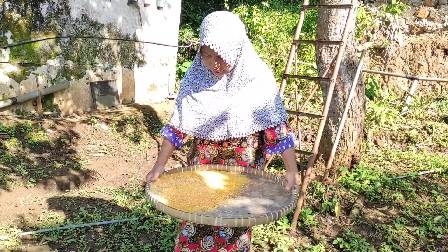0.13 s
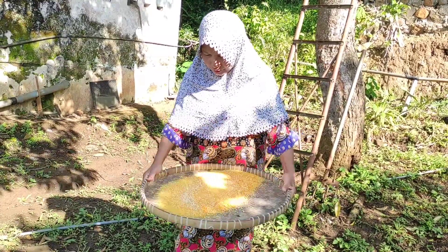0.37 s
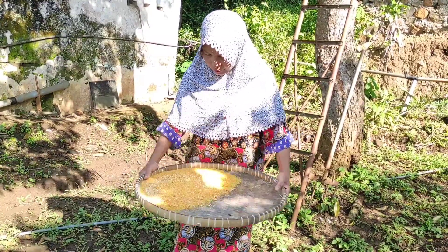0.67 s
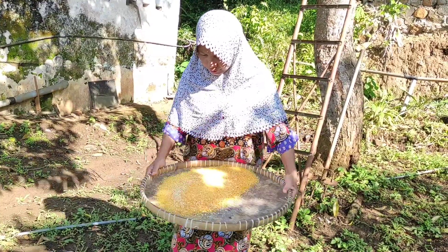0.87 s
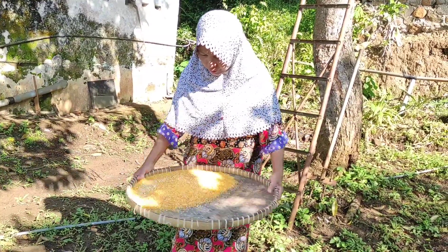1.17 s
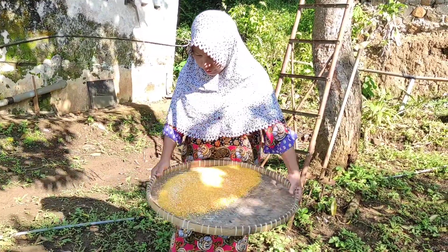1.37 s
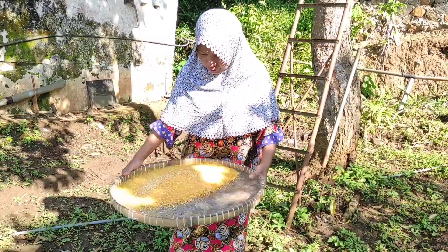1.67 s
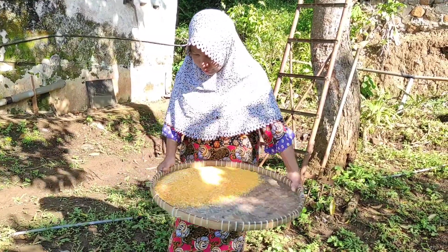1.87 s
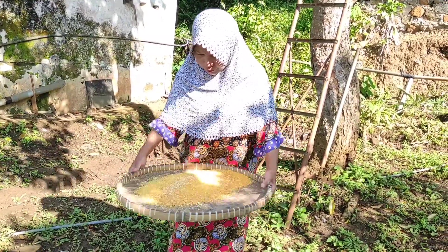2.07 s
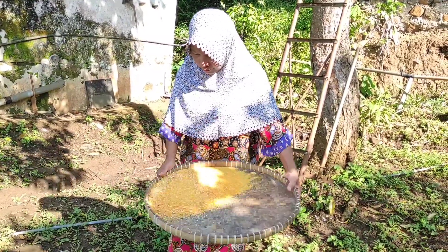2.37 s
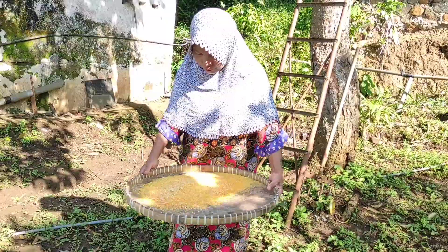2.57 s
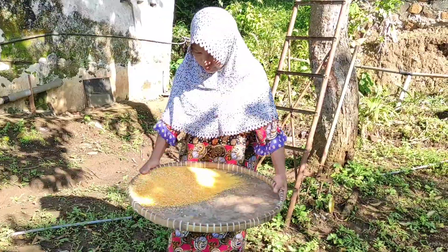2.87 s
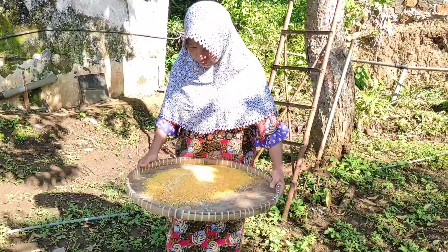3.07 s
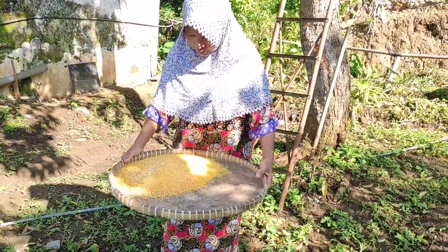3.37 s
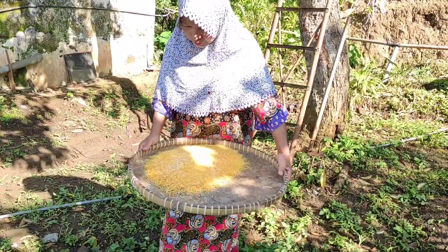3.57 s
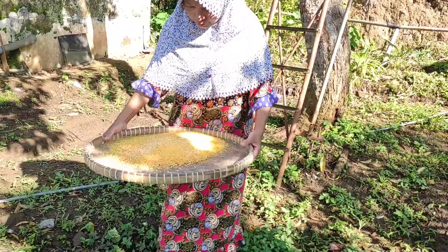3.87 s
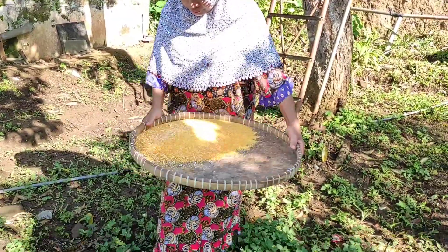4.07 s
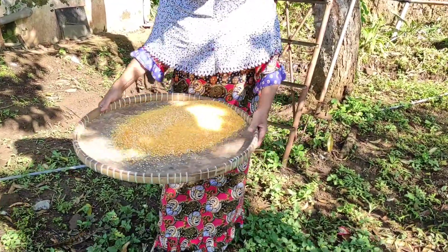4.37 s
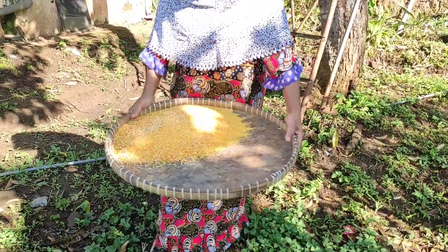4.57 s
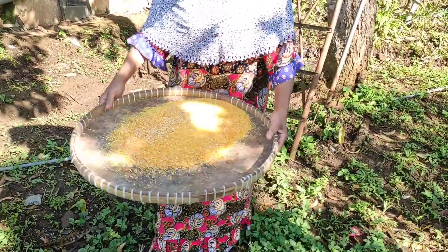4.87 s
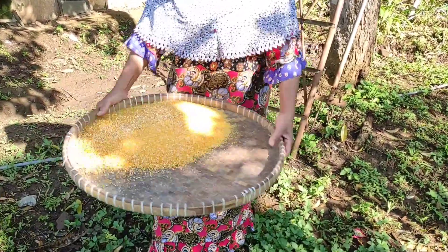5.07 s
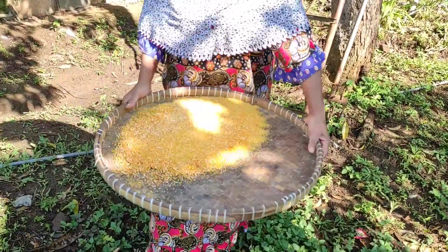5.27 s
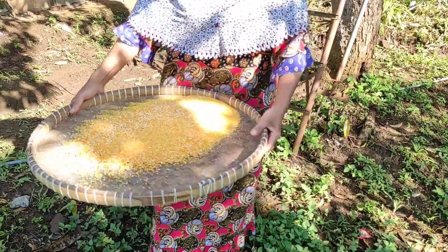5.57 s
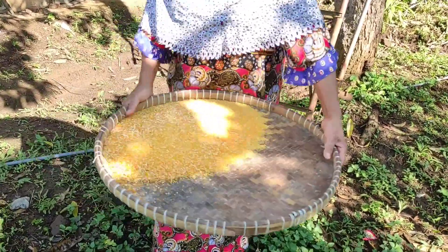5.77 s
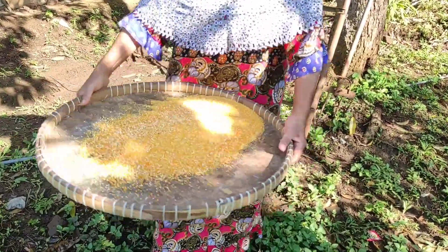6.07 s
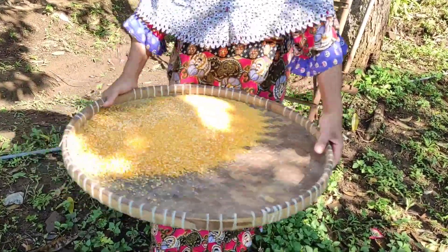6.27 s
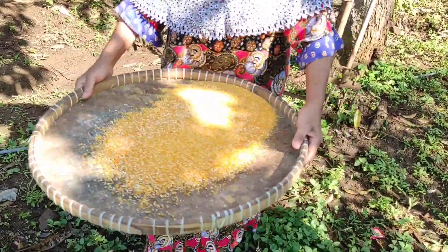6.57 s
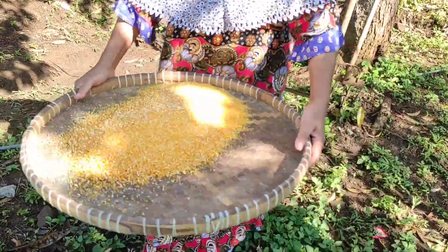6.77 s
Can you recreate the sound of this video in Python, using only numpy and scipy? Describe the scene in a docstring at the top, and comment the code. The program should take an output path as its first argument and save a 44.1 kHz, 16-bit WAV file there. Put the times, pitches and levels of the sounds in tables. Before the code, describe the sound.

Outdoors, close to a small stereo microphone, coarse cracked grain is shaken on a broad woven bamboo tray for about seven seconds. Strokes arrive nearly four a second, alternating a gradual swing back with an abrupt, crisper jerk out. Each is a short burst of bright, sizzling hiss made of countless kernel ticks, with a midrange rasp over the strips and quieter hollow drumming from the tray, dropping quickly into a small lull. A lone kernel ticks at 0.6 s. A low wind thump hits the right at 1.6 s; stronger fluttering puffs come around 3.1 s left, then 3.3-3.9 s right. A faint bamboo snap falls at 4.6 s and a sharp one at 5.1 s. From about 5 s the strokes are slightly louder and fuller. Another kernel ticks at 6.2 s. A very faint, dull murmur of leaves and distance stays beneath.

```python
"""Bursts of bright hiss and low drumming, about four a second: cracked grain slides to and fro over a
woven bamboo tray held near a small two-port microphone, outdoors. Random kernel impacts are filtered into
hiss, rasp and drumming that follow each stroke; decaying sines make the snaps and lone kernels.
Filtered noise makes the wind, gusting at each port on its own, and the faint yard murmur."""
import sys
import numpy as np
from scipy import signal
from scipy.fft import rfft, irfft, next_fast_len
from scipy.io import wavfile
from scipy.ndimage import uniform_filter1d, map_coordinates

SR = 44100
rng = np.random.default_rng(int(sys.argv[2]) if len(sys.argv) > 2 else 0)


def materialize(psi):
    """Save the field psi as 16-bit PCM at rate SR to the path in sys.argv[1].

    A 1-D psi becomes a single channel; in a 2-D psi each row is a channel.
    """
    bounded = np.clip(np.atleast_2d(psi).T, -1, 1)
    quanta = np.round(bounded * 32767).astype(np.int16)
    wavfile.write(sys.argv[1], SR, quanta)


N = 305172

# Strokes of the tray, a slow swing back then a sharp jerk out in turn. Each row: full speed reached in
# seconds, time held in seconds, mid-hold hiss level in dB, base rise in dB/s, base fall in dB/s,
# rasp re hiss in dB, drumming re hiss in dB.
STROKES = [(-0.082, 0.058, -30.5, 60.0, 162, -7, -11), (0.193, 0.06, -26.5, 287, 190.0, -10, -14.5),
           (0.443, 0.042, -27.8, 186, 157, -8.5, -12.5), (0.745, 0.053, -27, 280.0, 220.0, -9, -13),
           (0.97, 0.06, -28.5, 225, 178, -8, -12.5), (1.251, 0.051, -26.5, 305, 168, -8.5, -14),
           (1.507, 0.058, -28, 190, 180.0, -8, -12), (1.802, 0.068, -26.5, 338, 200.0, -7.5, -12.5),
           (2.055, 0.06, -29.5, 155, 162, -8, -12), (2.357, 0.064, -27, 258, 160.0, -8.5, -12),
           (2.609, 0.044, -31, 151, 129, -7.5, -11), (2.892, 0.062, -27.5, 457, 164, -8.5, -13),
           (3.166, 0.057, -28.5, 181, 153, -8, -11.5), (3.443, 0.063, -28, 412, 203, -8.5, -13),
           (3.706, 0.053, -28, 176, 136, -8, -11.5), (4, 0.07, -27.5, 293, 195, -10, -13),
           (4.276, 0.05, -27, 171, 187, -7.5, -12), (4.582, 0.076, -26.5, 476, 186, -8, -11.5),
           (4.853, 0.036, -27.5, 167, 139, -7.5, -11), (5.134, 0.067, -25.5, 460.0, 186, -8, -12),
           (5.429, 0.037, -26.5, 142, 147, -7, -11.5), (5.72, 0.075, -24.5, 574, 181, -8, -12.5),
           (6.01, 0.044, -25.5, 170.0, 154, -7.5, -12), (6.281, 0.086, -25.5, 588, 224, -8, -12.5),
           (6.572, 0.044, -25, 175, 165, -7, -11.5), (6.841, 0.05, -24.5, 403, 100.0, -7, -13)]


def amp(db):
    """Decibels to gain."""
    return 10 ** (np.asarray(db) / 20)


def unit(x):
    """Scaled to rms 1."""
    return x / np.sqrt(np.mean(x ** 2) + 1e-20)


def shape(points):
    """Gain as a function of Hz from (Hz, dB) points, interpolated on a log axis."""
    point_hz, point_db = np.transpose(points)
    return lambda hz: amp(np.interp(np.log(hz + 1), np.log(point_hz + 1), point_db))


def curves(rows):
    """One value per sample for each column after the time in seconds."""
    knot_s, *columns = np.transpose(rows)
    t = np.arange(N) / SR
    return [np.interp(t, knot_s, column) for column in columns]


def wobble(knots_per_s):
    """A smooth random curve through evenly spaced knots."""
    knots = rng.standard_normal(int(N * knots_per_s / SR) + 4)
    return map_coordinates(knots, [np.arange(N) * knots_per_s / SR])


def filtered(x, response):
    """x through a (complex) response of frequency in Hz, zero-padded against wrap-round."""
    m = next_fast_len(N + SR // 2)
    spectrum = rfft(x, m) * response(np.fft.rfftfreq(m, 1 / SR))
    return irfft(spectrum, m)[..., :N]


def sides(left_re_right_db):
    """Left and right gains for a level difference."""
    return amp(np.array([left_re_right_db / 2, -left_re_right_db / 2]))


def yard():
    """The faint outdoor murmur of leaves and distance: noise partly shared by the ports."""
    # Each row: frequency in Hz, relative level in dB.
    murmur_shape = [(20, -12), (60, 9.5), (200, 2), (600, 0), (2000, -23), (6000, -2), (8000, -12.5),
                    (10000, -27), (16000, -38)]
    shared, left, right = rng.standard_normal((3, N))
    noise = 0.8 * shared + np.array([left, right])
    return amp(-54.5) * sides(np.array([1.5])) * unit(filtered(noise, shape(murmur_shape)))


def wind():
    """Eddies push on each port separately, in gusts; a few strike harder as short low pulses."""
    # Steady buffeting: left level in dB, right level in dB.
    breeze_db = [-52.5, -59]
    # Each row: centre in seconds, Gaussian half length in seconds, level in dB, port (0 left, 1 right).
    gusts = [(.25, .25, -65, 1), (.92, 0.098, -53, 1), (1.504, 0.13, -49, 1), (2.004, 0.45, -46.5, 0),
             (2.05, 0.056, -57, 1), (2.754, 0.24, -48, 1), (3.087, 0.054, -41, 0), (3.4, 0.093, -41, 1),
             (3.82, 0.083, -51, 1), (4.2, .15, -52, 1), (5.6, 0.11, -75, 1), (6.5, 0.1, -47, 1)]
    # Each row: frequency in Hz, relative level in dB.
    buffet_shape = [(10, 5.5), (30, 1.5), (60, 0.5), (110, -19.5), (200, -13), (400, -46.5)]
    # Each row: centre in seconds, level in dB, pitch at centre in Hz, Gaussian half length in seconds,
    # port (0 left, 1 right).
    puffs = [(0.935, -37, 45, .012, 1), (0.952, -40, 60, .008, 1), (1.589, -22.5, 64.6, 0.0044, 1),
             (3.059, -29.5, 30, .015, 0), (3.088, -24, 144, 0.0094, 0), (3.314, -42, 50, 0.029, 0),
             (3.308, -36, 60, .01, 1), (3.35, -43, 55, .01, 1), (3.375, -26, 131, 0.0042, 1),
             (3.388, -33.5, 81, .011, 1), (3.412, -39, 89, 0.011, 1), (3.76, -36, 45, 0.0073, 1),
             (3.791, -32, 50, .01, 1), (3.835, -39.5, 65, 0.017, 1), (3.871, -35, 60, 0.0084, 1)]
    t = np.arange(N) / SR
    strength = np.repeat(amp(breeze_db)[:, None], N, axis=1)
    for centre_s, half_s, db, port in gusts:
        strength[round(port)] += amp(db) * np.exp(-((t - centre_s) / half_s) ** 2)
    lumps = amp(4.6 * np.array([wobble(8.8), wobble(13)]))
    buffeting = filtered(rng.standard_normal((2, N)), shape(buffet_shape))
    out = strength * unit(lumps * buffeting)
    for centre_s, db, hz, half_s, port in puffs:
        from_centre = t - centre_s
        # the eddy slows as it passes
        swing = 0.3 + np.cos(2 * np.pi * hz * from_centre * (1 - 12 * from_centre))
        out[round(port)] += amp(db) * swing / 0.95 * np.exp(-(from_centre / half_s) ** 2)
    return out


def ticks():
    """Short dry bamboo snaps as the tray turns: a fast-decaying sine plus a little noise."""
    # Each row: start in seconds, level in dB.
    snaps = [(4.5773, -29), (5.1129, -18.5)]
    out, t = np.zeros((2, N + SR)), np.arange(200) / SR
    for start_s, db in snaps:
        ring = np.sin(2 * np.pi * 2300 * t) * np.exp(-t / 0.00022)
        crackle = 0.1 * rng.standard_normal((2, len(t))) * np.exp(-t / 0.001)
        out[:, round(start_s * SR):][:, :len(t)] += amp(db) * (ring + crackle)
    return out[:, :N]


def hops():
    """A single kernel lands in a lull: a bright decaying sine."""
    # Each row: start in seconds, level in dB.
    landings = [(.6325, -27), (6.1945, -29)]
    out, t = np.zeros(N), np.arange(100) / SR
    for start_s, db in landings:
        tick = np.sin(2 * np.pi * 7500 * t) * np.exp(-t / 0.00033)
        out[round(start_s * SR):][:len(t)] += amp(db) * tick
    return out * sides(np.array([2.5]))


def weave(hz):
    """The tray's broad resonances, summed with alternating sign."""
    # Each row: centre in Hz, width in Hz, gain in dB.
    modes = [(271.4, 124, 0), (517, 120, 2), (912, 610, -1)]
    total = 0
    for k, (centre_hz, width_hz, db) in enumerate(modes):
        damping = 1j * hz * width_hz
        total = total + (-1) ** k * amp(db) * damping / (centre_hz ** 2 - hz ** 2 + damping)
    return total


def drumming(knocks):
    """The tray's underside sounds in opposite phase; its ground echo cuts evenly spaced notches."""
    # Each row: time in seconds, ground echo delay in ms.
    echo_delay = [(0, 2.64), (2.5, 2.59), (4.2, 2.87), (5.5, 3.08), (6.92, 3.33)]
    direct = filtered(knocks, weave)
    # soil and weeds return mostly the lows
    dull = filtered(direct, lambda hz: 1 / (1 + (hz / 1100) ** 2))
    read_at = np.arange(N) - curves(echo_delay)[0] * SR / 1000
    echo = np.array([np.interp(read_at, np.arange(N), port) for port in dull])
    return unit(direct - 0.58 * echo)


def sliding(rel_db, rise, fall, stray_db):
    """Level in dB of heap strokes (rise, hold, fall) plus loose kernels, and the heap's power share."""
    # The slide still grows while speed is held: back in dB/s, out in dB/s.
    swell_db_per_s = [15, 24.5]
    t = np.arange(N // 16 + 1)[:, None] * 16 / SR
    full_s, held_s, db, up, down = np.transpose(STROKES)[:5]
    count = len(full_s)
    before_db = np.resize(rise, count) * up * np.clip(full_s - t, 0, None)
    to_mid_hold_s = np.clip(full_s + held_s / 2 - t, -held_s / 2, held_s / 2)
    swell_db = np.resize(swell_db_per_s, count) * to_mid_hold_s
    after_db = fall * down * np.clip(t - full_s - held_s, 0, None)
    power = amp(2 * (db + rel_db - before_db - swell_db - after_db)).sum(axis=1)
    total = power + amp(2 * stray_db)
    # the heap's inertia rounds each swing
    level_db = uniform_filter1d(10 * np.log10(total), size=45, mode="nearest")
    return curves(np.c_[t, level_db, power / total])


def contacts(busy, lag_spread, mean_excess_db, count):
    """Kernel impacts at both ports; busy 0-1 is the share of kernels that move."""
    # Each row: time in seconds, mean lag of the left port in samples (tray position).
    tray_lag = [(0, 2), (2.5, 4), (3.7, 4.06), (5.5, 3.77), (6.92, 5)]
    when, moving, size, sign = rng.random((count, 4)).T
    at = when * (N - 1)
    share = busy[at.astype(int)]
    strength = np.sign(sign - 0.5) * amp(-mean_excess_db * np.log(1 - size))
    force = (moving < share) * strength / np.sqrt(share)  # even mean power
    # each kernel lies elsewhere on the wide tray, so its path difference is its own
    lag = curves(tray_lag)[0][at.astype(int)] + lag_spread * rng.standard_normal(count)
    taps = np.arange(-4, 5)
    pair = []
    for arrival in (at + lag / 2, at - lag / 2):
        index = np.round(arrival)[:, None] + taps
        offset = index - arrival[:, None]
        # windowed sinc: arrival between samples
        pulse = force[:, None] * np.sinc(offset) * np.cos(np.pi * offset / 10) ** 2
        index = np.clip(index, 0, N - 1).astype(int)
        pair.append(np.bincount(index.ravel(), pulse.ravel(), N))
    return np.array(pair)


def patchy(x, depth_db):
    """Random gain in patches of time and frequency, shared by both ports."""
    z = signal.stft(x, nperseg=512)[2]
    field = uniform_filter1d(rng.standard_normal(z.shape[1:]), size=5, axis=0)
    field = uniform_filter1d(field, size=7, axis=1)
    return signal.istft(z * amp(depth_db * unit(field)), nperseg=512)[1][:, :N]


def grain():
    """Faster sliding sets more kernels moving: they tick, rasp over the strips and drum on the weave."""
    # Kernel ticks as coloured by each port's cavity. Each row: frequency in Hz, relative level in dB.
    left_hiss_shape = [(3500, -38.5), (5500, -27.5), (7000, -1), (7900, -1.5), (8600, 6.5), (9050, 3),
                       (9600, -5.5), (10400, -15.5), (12500, -18), (15000, -32)]
    right_hiss_shape = [(3500, -51.5), (5000, -19.5), (6400, -2.5), (7000, -1), (7400, 4.5), (7900, 3.5),
                        (8500, -4.5), (9500, -12), (10500, -15), (12500, -20), (15000, -33)]
    # Rasp over the strips. Each row: frequency in Hz, relative level in dB.
    rasp_shape = [(500, -22), (1000, -5), (1800, -0.5), (3000, 1.5), (3800, -2.5), (5000, 1), (7000, -7),
                  (10000, -34), (16000, -14)]
    *_, rasp_rel_db, drum_rel_db = np.transpose(STROKES)
    # rise (back, out) and fall are multiples of the base rates; stray: loose kernels that never rest
    hiss_db, heap = sliding(0, rise=1, fall=1, stray_db=-48)
    rasp_db = sliding(rasp_rel_db, rise=[0.87, 1.04], fall=1.05, stray_db=-60)[0]
    drum_db = sliding(drum_rel_db, rise=[0.87, 0.99], fall=1.084, stray_db=-64.5)[0]
    heap_left_db, stray_left_db = -1.3, 2.5  # left re right
    pan_db = heap * heap_left_db + (1 - heap) * stray_left_db
    busy = np.clip(amp(0.6 * (hiss_db + 28.5)), 0.15, 1)

    def port_response(hz):
        """Left and right cavity colour."""
        return np.array([shape(left_hiss_shape)(hz), shape(right_hiss_shape)(hz)])

    hits = contacts(busy, lag_spread=3.87, mean_excess_db=0.62, count=170000)
    hiss = amp(hiss_db) * unit(filtered(hits, port_response))
    rasp = amp(rasp_db) * unit(filtered(hits, shape(rasp_shape)))
    knocks = contacts(busy, lag_spread=4.5, mean_excess_db=0.43, count=60000)
    drum = amp(drum_db) * sides(np.array([3.5])) * drumming(knocks)
    # kernels move in clumps, each with its own colour
    return patchy(sides(pan_db) * (hiss + rasp) + drum, depth_db=1.26)


def scene():
    """Surroundings, wind, tray snaps, lone kernels and the sliding grain."""
    return yard() + wind() + ticks() + hops() + grain()


def record(dry):
    """The recorder keeps nothing above its band limit."""
    top_hz = 15450
    return filtered(dry, lambda hz: hz < top_hz)


dry = scene()
out = record(dry)
materialize(out)
```